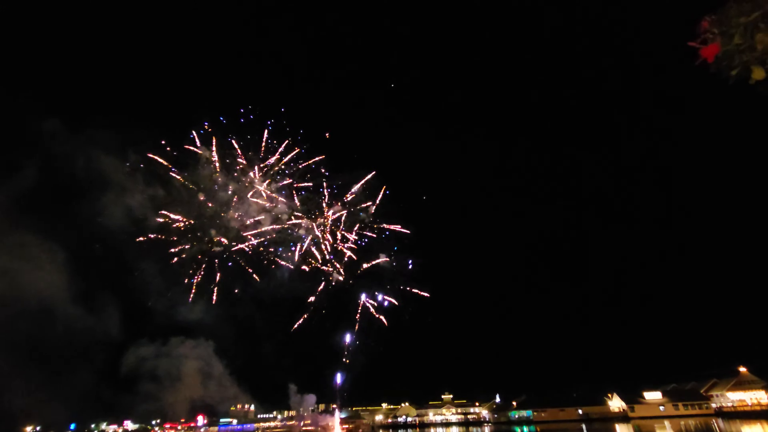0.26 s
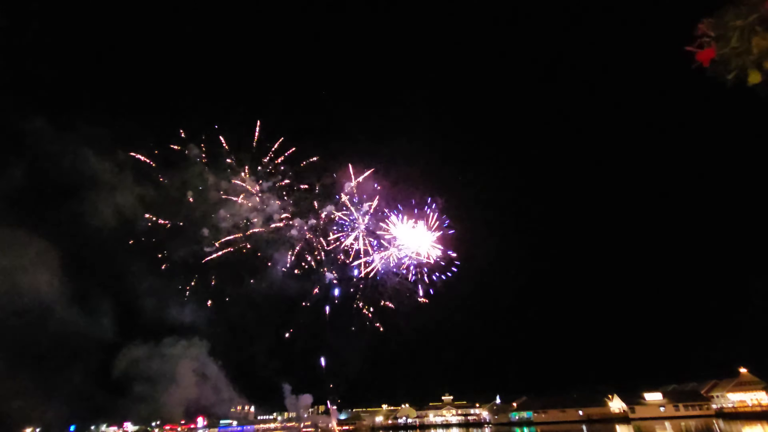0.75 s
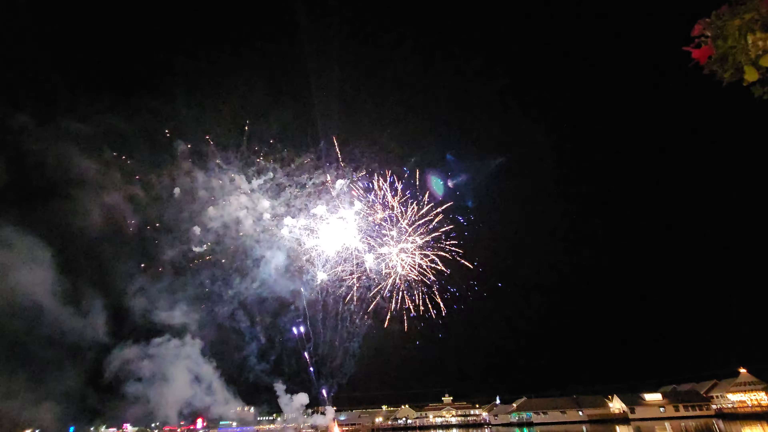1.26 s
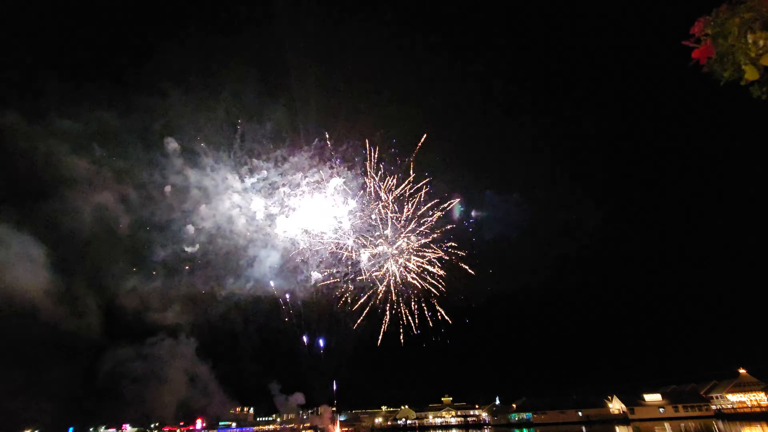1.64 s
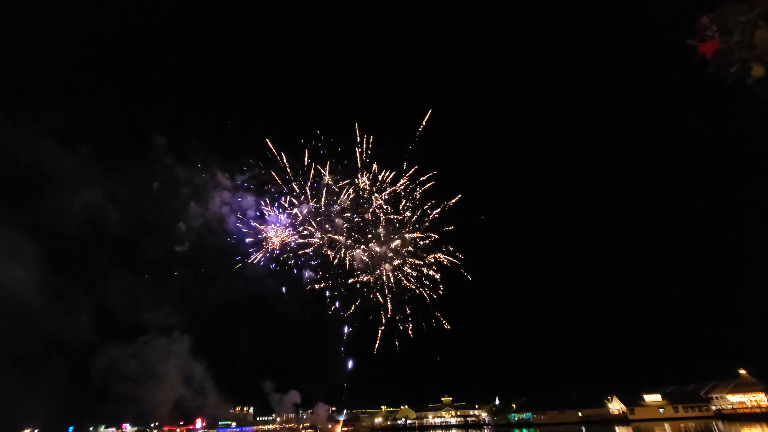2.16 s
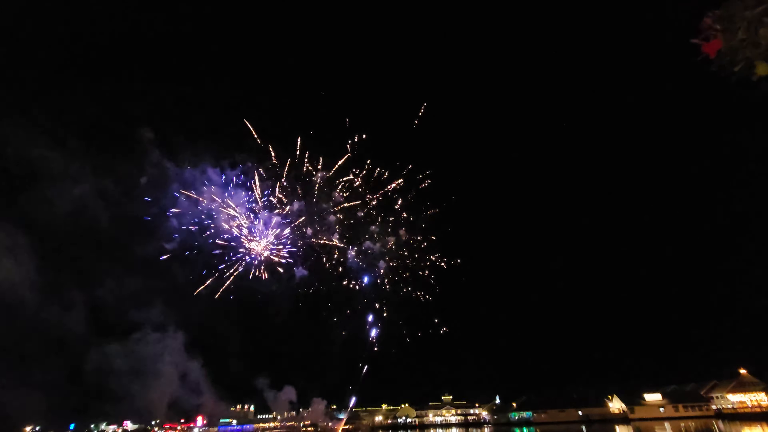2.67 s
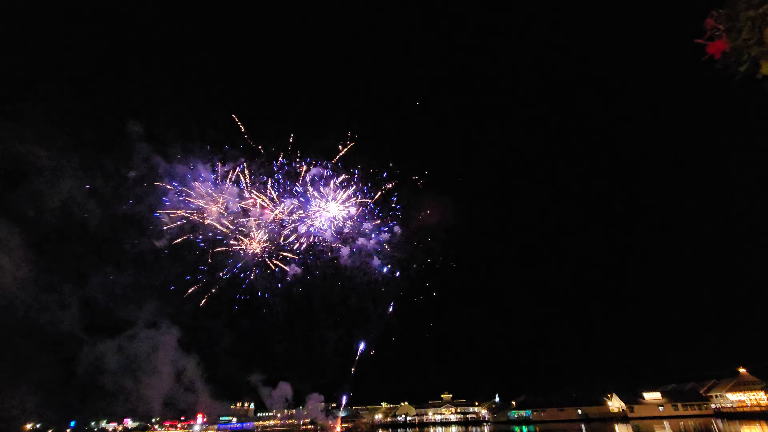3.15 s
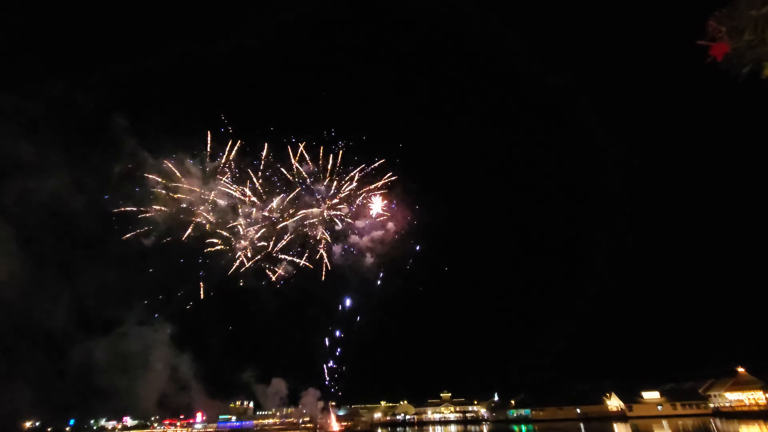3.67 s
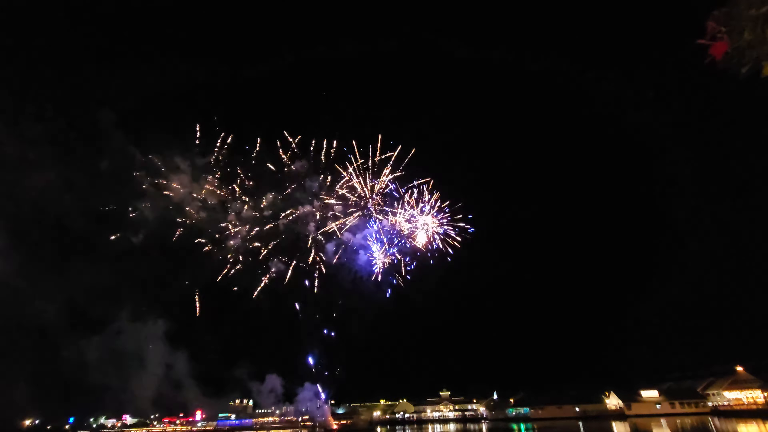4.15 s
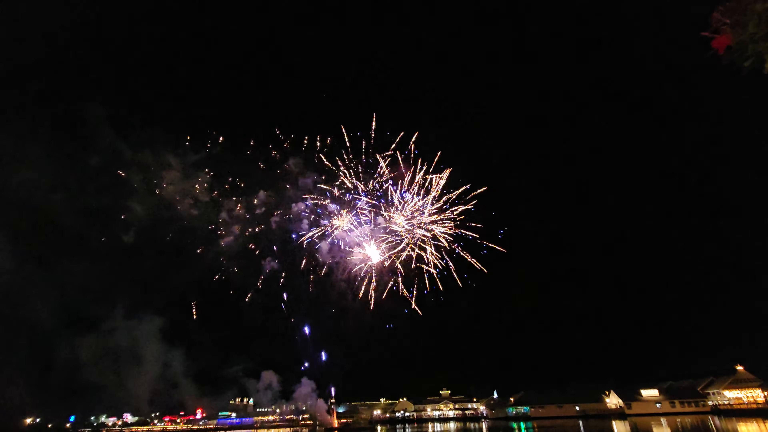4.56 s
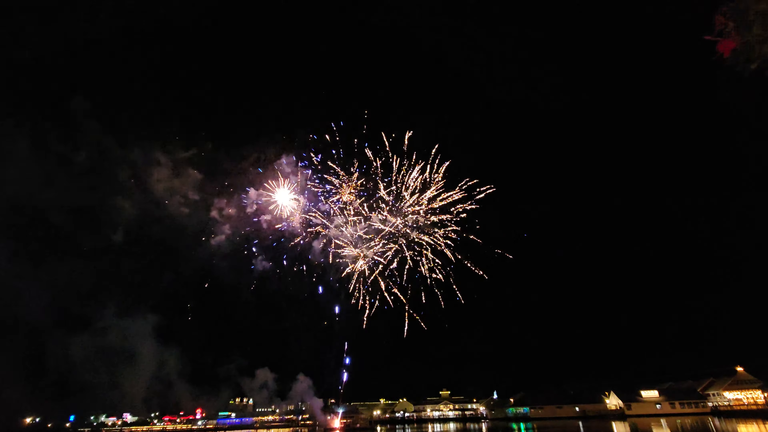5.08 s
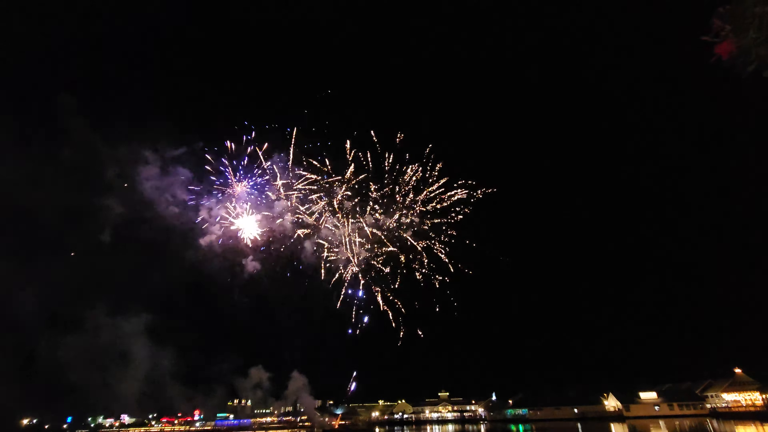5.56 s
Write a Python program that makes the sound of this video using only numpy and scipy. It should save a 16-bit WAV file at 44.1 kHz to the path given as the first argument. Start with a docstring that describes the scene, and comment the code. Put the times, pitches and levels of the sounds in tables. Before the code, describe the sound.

Two bangs open almost at once, then pops lead to a heavy blast and a run of cracks. Further bursts come in uneven groups, with brief gaps holding only light ticks and rumble, until a last strong bang near the end. Outdoor stereo from across water, with abrupt fronts, crackling scatter, slightly squashed peaks and wide hissing tails.

```python
"""A fireworks barrage over a lake at night, heard from the shore: steep minimum-phase shocks, frayed by noise.
Each shell's shock arrives through the air and, a few ms later, off the ground; smaller pops are dry ticks.
Some fronts overload the microphone and land with a deep thud, an added inverted pulse.
Noise that follows the cracks' energy gives the hiss of nearby scatter and a long grainy tail over the water.
Echoes from the far shore merge into a low rumble: shaped noise with a slow level curve."""
import sys
import numpy as np
from scipy import signal
from scipy.fft import rfft, irfft, next_fast_len
from scipy.io import wavfile

SR = 44100
rng = np.random.default_rng(int(sys.argv[2]) if len(sys.argv) > 2 else 0)


def log_audio(samples):
    """Write samples as a 16-bit WAV file to the path given in sys.argv[1]."""
    # one column per channel
    frames = np.atleast_2d(samples).T
    # limit to full scale, then quantise
    limited = np.clip(frames, -1, 1)
    pcm = np.round(limited * 32767).astype(np.int16)
    wavfile.write(sys.argv[1], SR, pcm)


N = 256662

# Shell bursts. Each row: arrival in seconds, ground echo lag in seconds, relative strength in dB,
# slump of the first crest as linear gain of the thud (0 none, 1 heavy).
BURSTS = [(0.0843,.0062,-.5,0.44), (0.1003,0.0057,-3,0.22), (0.8043,0.0056,3.5,1.7),
          (0.904,0.0047,1.5,0.094), (0.99,.0047,-1,0), (1.1413,0.0053,1,0), (1.1437,0.0047,-2.5,0.33),
          (1.3425,0.0042,.5,1.15), (1.409,0.0047,-2.5,0.048), (1.5271,0.0049,-2.5,0.27),
          (1.5745,0.0057,-4,0.14), (1.752,0.005,-3,0.29), (2.1154,0.0059,1,0.62), (2.4374,0.0058,4,1.4),
          (2.8979,0.0052,2.5,1.6), (3.0006,0.0045,2,0), (3.2707,.0045,2.5,0.084), (3.2902,.0054,-1.5,0.34),
          (3.2932,0.0062,-4.5,0.21), (3.318,0.0054,-6,0.068), (3.461,0.0056,-1,.85), (3.5277,0.0059,-3,0.1),
          (4.1323,.0061,0,1.14), (4.3573,0.0052,1.5,0), (4.3735,0.0056,-0.5,0.056), (4.4141,.0045,-2.5,0),
          (4.4697,0.0052,-3.5,0), (4.5956,0.0047,-1,0.78), (4.836,0.0056,-1,1.44), (4.9141,.0054,-1,0),
          (5.0053,0.0044,-1,0.089), (5.2356,0.0062,-.5,0.48), (5.2772,0.0054,-2.5,0.099),
          (5.5062,0.006,2,1.5)]
# Clearer small reports. Each row: arrival in seconds, relative level in dB,
# brightness in dB (tilt from 2 kHz, full at 8 kHz).
POPS = [(0.156,3.5,9), (0.3406,5,0), (0.5465,6.5,2.5), (0.6735,7.5,5.5), (0.873,3.5,6), (1.052,0.5,2),
        (1.2328,3.5,6), (1.692,-2.5,9), (1.916,2,7.5), (2.0492,3.5,5), (2.21,2.5,11), (2.3366,4.5,5),
        (2.5199,1.5,3), (2.6833,5,-0.5), (2.8434,6,4.5), (3.1755,3,-1), (3.599,-.5,19), (3.6491,2,17.5),
        (3.787,4,11.5), (3.904,5.5,8.5), (4.0787,7,5.5), (4.2981,5,1), (4.4533,1,16), (4.78,6,15),
        (5.0627,2.5,18), (5.2208,3.5,13), (5.3521,-1.5,8), (5.488,2.5,7), (5.628,-4,1)]
# Colour of one shock. Each row: frequency in Hz, relative level in dB.
BURST_COLOUR_DB = [(25, -0.5), (90, 9.5), (130, 14), (170, 23), (240, 32.5), (370, 30), (520, 23.5),
                   (680, 14), (950, 22.5), (1400, 10), (1700, 15.5), (2400, 3.5), (7000, 2), (11000, -4),
                   (16000, -6.7)]
# A stronger shell gains more in knock than in crack. Each row: frequency in Hz, gain in dB per dB of strength.
GROWTH_DB_PER_DB = [(300, 1.0), (1100, 1.1), (4500, 0.72)]
# Thud of an overloaded front at full slump. Each row: frequency in Hz, level in dB (right port).
SLUMP_COLOUR_DB = [(25, 19.5), (90, 26), (200, 25.5), (450, 24), (1000, 11.5), (4000, -16.5)]
# Colour of one pop. Each row: frequency in Hz, relative level in dB.
POP_COLOUR_DB = [(30, 2), (120, 17), (280, 13), (450, 13.5), (620, -4.5), (900, 6), (1500, -2.5),
                 (2200, -1.5), (3500, -12), (7000, -26.5), (11000, -24), (16000, -40)]
# Scatter from nearby things. Each row: frequency in Hz, level against the shock in dB.
NEAR_COLOUR_DB = [(60, -25), (300, -23.5), (700, -18.5), (1600, -9.5), (2600, -13), (6000, -8),
                  (16000, -9.5)]
# Scatter over the water. Each row: frequency in Hz, level against the shock in dB.
FAR_COLOUR_DB = [(60, -18), (300, -23), (700, -32.5), (1100, -29), (2500, -28), (4000, -16), (7500, -12),
                 (9000, -20.5), (13000, -13), (16000, -24)]
# Decay of the scatter over the water. Each row: frequency in Hz, time to fall 60 dB in seconds.
FAR_T60_S = [(60, 9.5), (1000, 1.2), (4000, 0.8), (8000, 1.3), (16000, 0.28)]
# Colour of the far shore's rumble. Each row: frequency in Hz, relative density in dB per Hz.
RUMBLE_COLOUR_DB = [(20, -35), (45, -5.5), (75, -1), (130, -2.5), (190, 2.5), (270, 3), (340, -4.5),
                    (450, -4.5), (530, -12), (640, -22), (1000, -20), (2200, -32), (5000, -37),
                    (16000, -57.5)]
# Level curve of the rumble. Each row: time in seconds, relative level in dB.
RUMBLE_LEVEL_DB = [(0.0, -32.5), (0.26, -33.5), (0.71, -37), (1.38, -33.5), (2.85, -34.5), (3.42, -34),
                   (4.1, -35), (5.4, -33), (5.82, -32.5)]
# Left-right correlation of diffuse sound. Each row: frequency in Hz, correlation (1 identical, 0 unrelated).
LIKENESS = [(60, 1), (130, 0.95), (290, 0.87), (640, 0), (1400, 0), (16000, 0.063)]
# Microphone port difference. Each row: frequency in Hz, left minus right in dB.
BALANCE_DB = [(40, 0), (90, 0.5), (180, 1), (1000, 1.5), (2000, 2), (6000, 0), (7800, -1), (10800, -5),
              (12500, 3), (16000, -2)]

SIDES = np.array([[1], [-1]])  # left, right
SHOCK_SIZE = 4096  # samples
LEAD_S = .0003  # head room so that either port may hear a front first
SLUMP_LEFT_DB = -7.5  # left port's thud against the right's
FAINT_POPS_PER_S, FAINT_POP_DB, FAINT_SPREAD_DB, FAINT_BRIGHT_DB = 3.7, -12.5, 2, 6
NEAR_T60_S = 0.063
CUTOFF_HZ = 15900


def bursts(direct_db=.5, ground_db=-.5, ground_bass_db=-5.0):
    """Each burst is a shock, coloured by its strength, and its thinner, rougher bounce off the ground."""
    out, hz = np.zeros((2, N)), bins(SHOCK_SIZE)
    bounce_points = [(120, ground_bass_db), (400, ground_db), (1000, ground_db - 9.5), (4000, ground_db)]
    bounce_db = at_hz(bounce_points, hz)
    # an overloaded crest slumps into a downward pulse, above all at the right port
    thud_db = at_hz(SLUMP_COLOUR_DB, hz) + np.array([[SLUMP_LEFT_DB], [0]])
    thud = -in_time(causal(thud_db))
    for start_s, lag_s, strength_db, slump in BURSTS:
        db = at_hz(BURST_COLOUR_DB, hz) + strength_db * at_hz(GROWTH_DB_PER_DB, hz)
        add(out, start_s - LEAD_S, shock(db + direct_db, ragged_hz=2440, ragged_s=0.001))
        add(out, start_s, slump * thud)
        add(out, start_s + lag_s - LEAD_S, shock(db + bounce_db, ragged_hz=1870, ragged_s=0.0012))
    return out


def shock(db, ragged_hz, ragged_s):
    """One pressure front; above ragged_hz it is frayed into a brief spray of tiny reflections."""
    hz, t_s = bins(SHOCK_SIZE), np.arange(SHOCK_SIZE) / SR
    spray = rng.standard_normal((2, SHOCK_SIZE)) * np.exp(-t_s / ragged_s)
    spray = rfft(spray / np.sqrt(np.sum(spray ** 2, axis=1, keepdims=True)))
    frayed = (1j * hz / (ragged_hz + 1j * hz)) ** 2
    # the clean part takes the power the spray leaves
    clean = causal(10 * np.log10(1 - np.abs(frayed) ** 2))
    # shells spread across the sky, so the front reaches the right port a little later or earlier
    lag_s = np.array([[LEAD_S], [LEAD_S + rng.normal(6e-5, 7e-5)]])
    delay = np.exp(-2j * np.pi * hz * lag_s)
    return in_time(causal(db) * (clean + frayed * spray) * delay)


def pops(level_db=-3.0):
    """Small charges give one light, dry tick each."""
    out, hz = np.zeros((2, N)), bins(SHOCK_SIZE)
    for start_s, pop_db, bright_db in POPS + faint_pops():
        tilt_db = at_hz([(2000, 0), (8000, bright_db)], hz)
        db = at_hz(POP_COLOUR_DB, hz) + level_db + pop_db + tilt_db
        add(out, start_s - LEAD_S, shock(db, ragged_hz=2620, ragged_s=0.00082))
    return out


def faint_pops():
    """Rows like those of POPS for the tiny charges that go off at random."""
    draws = rng.random((round(FAINT_POPS_PER_S * N / SR), 2))
    rows = []
    for when, size in draws:
        pop_db = FAINT_POP_DB + FAINT_SPREAD_DB * (2 * size - 1)
        rows.append((when * N / SR, pop_db, FAINT_BRIGHT_DB))
    return rows


def scatter(x, colour_db, t60_points, build_s):
    """Echoes from many surfaces: noise whose energy builds up and dies at its own rate in each octave."""
    size = next_fast_len(N)
    hz, noise, out = bins(size), diffuse(colour_db, size), 0
    centres_hz = 62.5 * 2 ** np.arange(9)
    rise = np.exp(-1 / (build_s * SR))
    mono = x.sum(0) / np.sqrt(2) + 1e-18
    for centre_hz, pick in zip(centres_hz, np.eye(len(centres_hz))):
        low_hz, high_hz = centre_hz / np.sqrt(2), min(centre_hz * np.sqrt(2), CUTOFF_HZ)
        octave = signal.butter(2, [low_hz, high_hz], "band", fs=SR, output="sos")
        band = signal.sosfilt(octave, mono)
        power = band ** 2 * SR / 2 / (high_hz - low_hz)
        keep = from_db(-120 / (at_hz(t60_points, centre_hz) * SR))  # power: 60 dB down after T60
        power = signal.lfilter([1 - keep], [1, -keep], power + 1e-18)
        power = signal.lfilter([1 - rise], [1, -rise], power)
        # triangular crossfade between octaves
        noise_band = irfft(noise * at_hz(np.c_[centres_hz, pick], hz), size)[:, :N]
        out = out + np.sqrt(power) * noise_band
    return out


def rumble(level_db=1.0, lumpy_db=1.44):
    """Overlapping far echoes roll on unevenly: diffuse noise on a level curve with random lumps."""
    curve_db = np.interp(np.arange(N) / SR, *np.transpose(RUMBLE_LEVEL_DB))
    total_db = level_db + curve_db + lumpy_db * lumps(per_s=30)
    return from_db(total_db) * rms_one(irfft(diffuse(RUMBLE_COLOUR_DB, N), N))


def diffuse(colour_db, size):
    """Spectrum of stereo noise from all sides: alike in the bass, nearly unrelated in the treble."""
    hz = bins(size)
    alike = np.clip(at_hz(LIKENESS, hz), -.99, .99)
    mid, side = rfft(rng.standard_normal((2, size)))
    stereo = np.sqrt((1 + alike) / 2) * mid + np.sqrt((1 - alike) / 2) * side * SIDES
    return from_db(at_hz(colour_db, hz)) * stereo


def lumps(per_s):
    """Random ups and downs of unit deviation, per_s points a second joined by straight lines."""
    return np.interp(np.arange(N) / SR * per_s, np.arange(SHOCK_SIZE), rng.standard_normal(SHOCK_SIZE))


def causal(db):
    """Minimum-phase response with this colour: a steep front, then the swing back."""
    cepstrum = irfft(np.log(from_db(db)))
    half = cepstrum.shape[-1] // 2
    cepstrum[..., 1:half] *= 2
    cepstrum[..., half + 1:] = 0
    return np.exp(rfft(cepstrum))


def in_time(response):
    """First half of a spectrum's impulse response, faded out along its length."""
    half = SHOCK_SIZE // 2
    return irfft(response)[:, :half] * np.cos(np.linspace(0, np.pi / 2, half)) ** 2


def add(out, start_s, sound):
    """Mix a sound in at start_s."""
    i = int(np.clip(round(start_s * SR), 0, N - 1))
    out[:, i:i + sound.shape[1]] += sound[:, :N - i]


def at_hz(points, hz):
    """Read a table of (Hz, value) on a log-frequency axis."""
    f_hz, value = np.transpose(points)
    return np.interp(np.log(hz + 1e-3), np.log(f_hz), value)


def bins(size):
    """Bin frequencies in Hz of a real spectrum."""
    return np.arange(size // 2 + 1) * SR / size


def from_db(db):
    """Amplitude factor of a level in dB."""
    return 10 ** (np.asarray(db) / 20)


def rms_one(x):
    """Scale to unit RMS over both channels."""
    return x / np.sqrt(np.mean(x ** 2) + 1e-20)


def scene(grain_db=1.2):
    """Direct reports, scatter from close by, the long grainy tail over the water, and the rumble."""
    reports = bursts() + pops()
    near = scatter(reports, NEAR_COLOUR_DB, [(1000, NEAR_T60_S)], build_s=0.0003)
    far = scatter(reports, FAR_COLOUR_DB, FAR_T60_S, build_s=0.0032)
    grain = from_db(grain_db * lumps(per_s=330))
    return reports + (near + far) * grain + rumble()


def record(dry):
    """The two microphone ports differ in colour; the highest peaks are rounded and the top is cut."""
    ports = in_time(causal(SIDES * at_hz(BALANCE_DB, bins(SHOCK_SIZE)) / 2))
    x = signal.fftconvolve(dry, ports, axes=1)[:, :N]
    x = x / (1 + (x / .92) ** 6) ** (1 / 6)  # soft ceiling at 0.92
    lowpass = signal.ellip(10, .2, 80, CUTOFF_HZ, fs=SR, output="sos")
    return signal.sosfilt(lowpass, x)


dry = scene()
out = record(dry)
log_audio(out)
```